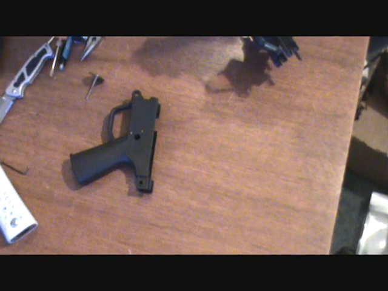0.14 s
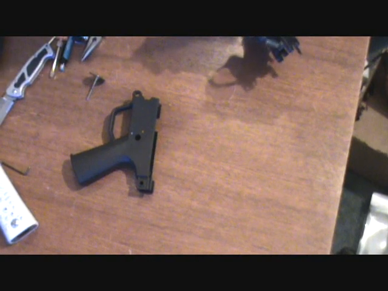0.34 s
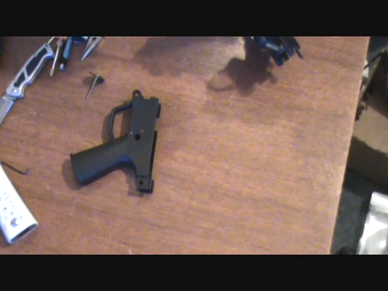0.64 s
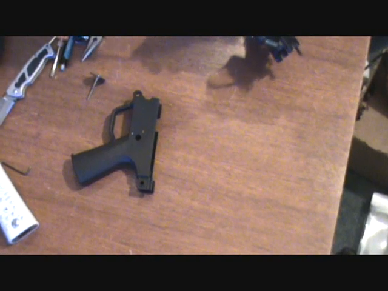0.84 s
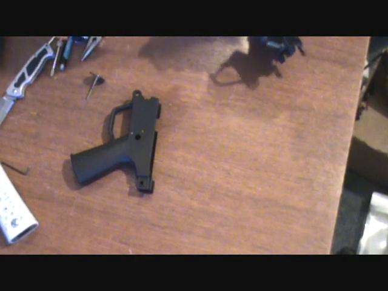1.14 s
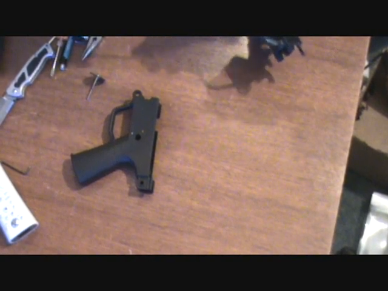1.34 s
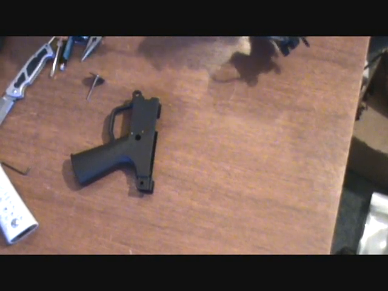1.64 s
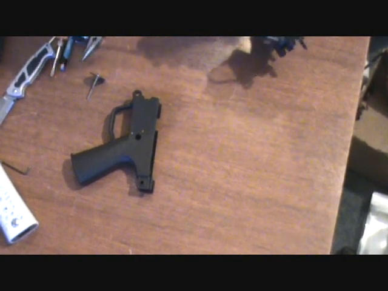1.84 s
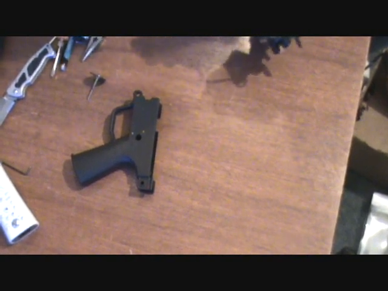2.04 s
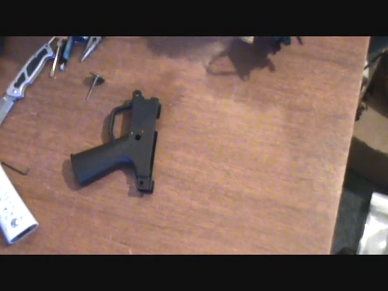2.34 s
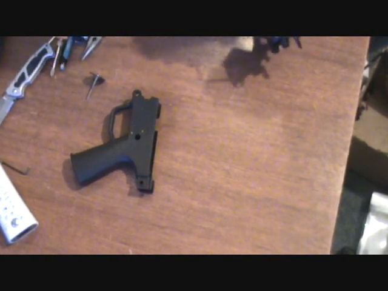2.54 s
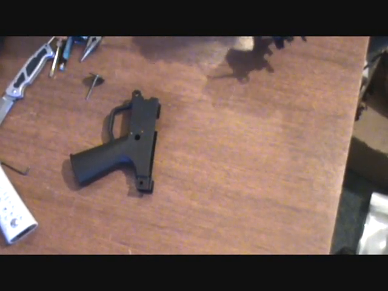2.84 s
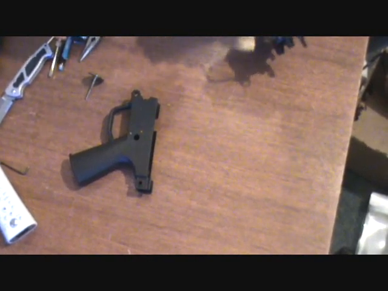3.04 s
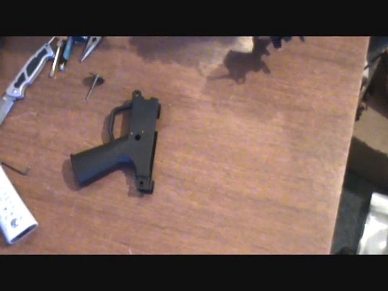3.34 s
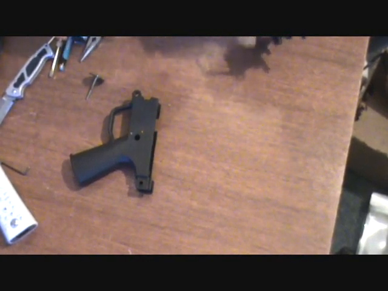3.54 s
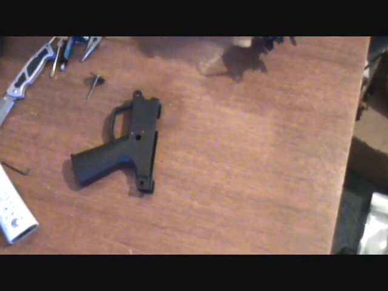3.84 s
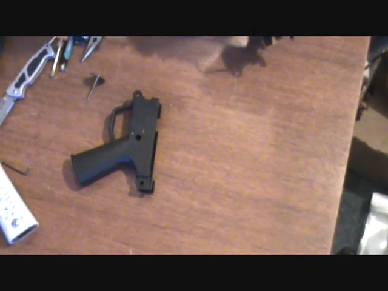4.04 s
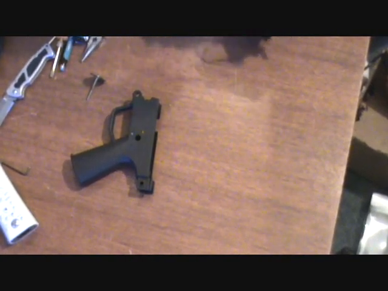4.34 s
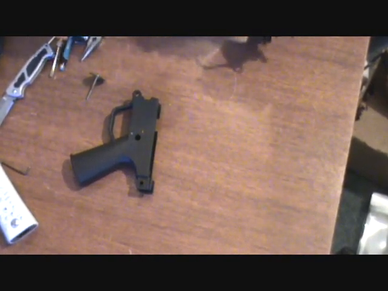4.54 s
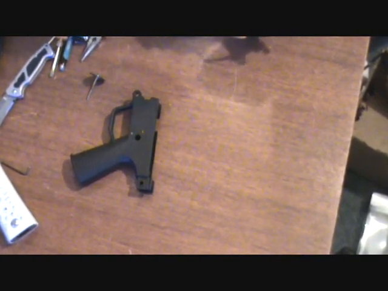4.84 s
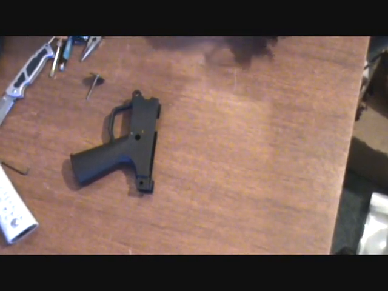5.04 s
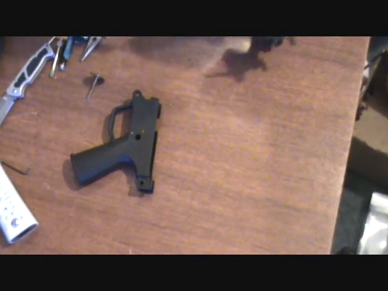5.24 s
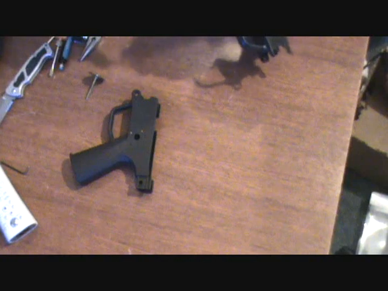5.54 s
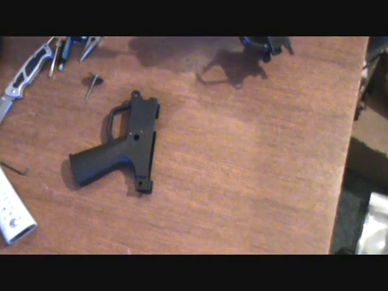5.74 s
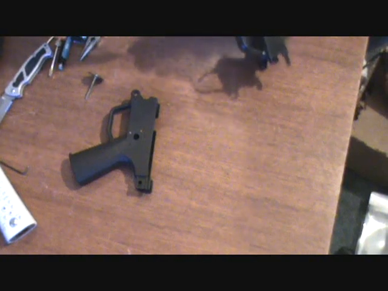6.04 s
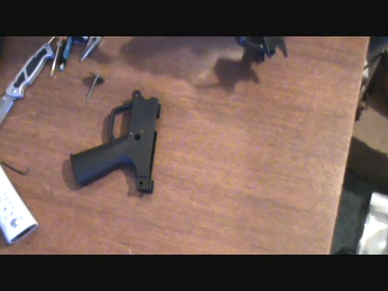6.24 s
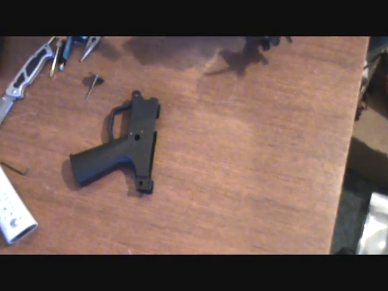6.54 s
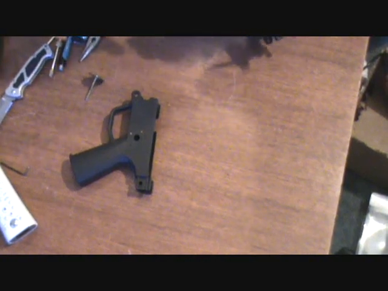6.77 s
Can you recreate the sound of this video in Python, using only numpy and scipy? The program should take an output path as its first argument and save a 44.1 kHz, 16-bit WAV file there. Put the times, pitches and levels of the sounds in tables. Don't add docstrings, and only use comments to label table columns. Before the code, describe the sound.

After a near-quiet half second of hiss and hum, a bright metal snap rings out, then pairs of clicks, a run of ticks, and dense snapping and scraping in the middle. Hard, rapid clinks follow around five seconds, then a crisp glancing tick after six and a fade into faint touches. Heard from about half a metre in a small, dry furnished room.

```python
import sys
import numpy as np
from scipy import signal
from scipy.fft import rfft, irfft, next_fast_len
from scipy.io import wavfile
from scipy.ndimage import map_coordinates

SR = 44100
rng = np.random.default_rng(int(sys.argv[2]) if len(sys.argv) > 2 else 0)


def undo_db(level):
    steps = np.asarray(level, float) / 20
    return 10 ** steps


def to_wav(sig):
    pcm = np.clip(np.atleast_2d(sig), -1, 1) * 32767
    pcm = np.round(pcm).astype(np.int16)
    wavfile.write(sys.argv[1], SR, pcm.T)


N = 304593

# (pitch [Hz], level [dB], width [Hz])
HOUSING = [(1765, -5, 275), (2287, 2.5, 190), (2500, -1.5, 480)]


def unit(x):
    return x / np.sqrt(np.mean(x ** 2) + 1e-20)


def along(points, hz):
    f, v = np.transpose(points)
    return np.interp(np.log(hz + 1), np.log(f + 1), v)


def curves(rows):
    s, *cols = np.transpose(rows)
    return [np.interp(np.arange(N) / SR, s, c) for c in cols]


def wobble(rate):
    knots = rng.standard_normal(int(N * rate / SR) + 4)
    return map_coordinates(knots, [np.arange(N) * rate / SR])


def filtered(x, response):
    m = next_fast_len(N + 8192)
    return irfft(rfft(x, m) * response(np.fft.rfftfreq(m, 1 / SR)), m)[..., :N]


def band(x, low_hz, high_hz):
    sos = signal.butter(3, [low_hz, min(high_hz, .45 * SR)], "bandpass", fs=SR, output="sos")
    return signal.sosfilt(sos, x)


def resonance(hz, width_hz):
    return lambda f: 1j * f * width_hz / (hz * hz - f * f + 1j * f * width_hz)


def rush(gain, alike):
    def mid_side(hz):
        turn = np.arccos(np.clip(along(alike, hz), -1, 1)) / 2
        return gain(hz) * [np.cos(turn), np.sin(turn)]

    mid, side = filtered(rng.standard_normal((2, N)), mid_side)
    return unit(np.array([mid + side, mid - side]))


def background():
    # (pitch [Hz], rms level [dB])
    whines = [(258.4, -69.5), (753.7, -71.5), (839.8, -78), (904.4, -69.5), (1184, -71.5), (1960, -68.5),
              (2110, -71.5)]
    # (pitch [Hz], rms level [dB])
    hum = [(52.5, -63.5)]
    # (frequency [Hz], level per Hz [dB])
    hiss_colour = [(25, -27), (40, 0), (75, -12), (205, -4.5), (360, -4.5), (500, -7.5), (900, -6.5),
                   (1500, -11), (2000, -10.5), (4080, -20.5), (8000, -23.5), (11500, -22), (14000, -22.5),
                   (15800, -24.5)]
    # (frequency [Hz], correlation [1])
    likeness = [(60, 0.93), (180, 0.88), (550, 0.3), (1650, 0.029), (4970, 0.084), (15000, 0.87)]
    t = np.arange(N) / SR
    tones = np.zeros(N)
    for hz, db in whines + hum:
        unsteady_time = t + 0.00217 * np.cumsum(wobble(5)) / SR
        tones += undo_db(db + 2.5 + wobble(7.7)) * np.sin(2 * np.pi * hz * unsteady_time)
    hiss = rush(lambda f: undo_db(along(hiss_colour, f)), likeness)
    return tones + undo_db(-54 + 0.07 * wobble(2.0)) * hiss


def engine():
    # (time [s], firing pitch [Hz], tone level [dB])
    drone = [
        (0.5, 120.2, -82),
        (0.8, 113, -72),
        (1.14, 117.3, -59),
        (1.6, 115, -60.5),
        (2.3, 121.2, -55.5),
        (2.7, 110.2, -60.5),
        (3.1, 112, -67),
    ]
    firing_hz, tone_db = curves(drone)
    t = np.arange(N) / SR
    passing = np.interp(t, [.3, .7, 2.95, 3.3], [0, 1, 1, 0])
    tone = undo_db(tone_db - 3 + 0.96 * wobble(7.55)) * np.sin(2 * np.pi * np.cumsum(firing_hz) / SR)
    low, high = resonance(205, 30), resonance(255, 35)
    rumble = rush(lambda f: np.abs(low(f)) ** 2 + np.abs(high(f)) ** 2, [(200, 0.94)])
    rumble_db = -60.5 - (t - drone[0][0])
    return passing * (tone + undo_db(rumble_db) * rumble)


def bumps():
    # (time [s], peak level [dB], pitch [Hz], t60 [s])
    table_bumps = [(2.223, -43.5, 614, 0.2), (2.243, -42, 256, 0.053), (2.261, -49.5, 184, 0.3),
                   (2.298, -52, 272, 0.093), (3.394, -33.5, 514, 0.054), (5.016, -39, 1370, 0.085),
                   (5.201, -45, 197, 0.14), (5.207, -39.5, 1500, 0.18), (5.497, -50, 460, 0.076),
                   (5.951, -56, 790, 0.12), (5.967, -49, 434, 0.11), (6.02, -47, 150, 0.14),
                   (6.235, -66, 1170, 0.13), (6.511, -63, 264, 0.095), (6.888, -68, 266, 0.084)]
    out, t = np.zeros(N + SR), np.arange(SR // 3) / SR
    for s, db, hz, t60 in table_bumps:
        wood = unit(band(rng.standard_normal(len(t)), 0.77 * hz, 2.23 * hz))
        onset = 1 - np.exp(-t * hz / 1.12)
        out[round(s * SR):][:len(t)] += undo_db(db + 4.5 - 60 * t / t60) * onset * wood
    return out[:N]


def tails(count, alike=0.72):
    # (frequency [Hz], t60 [s])
    room_decay = [(500, 0.37), (1320, 0.23), (3480, 0.21), (9190, 0.18)]
    hz, t, z = signal.stft(rng.standard_normal((count, 2, SR // 3)), SR, nperseg=128)
    fade = undo_db(-60 * t / along(room_decay, hz)[:, None])
    noise = signal.istft(z * fade, SR, nperseg=128)[1]
    noise *= 1 - np.exp(-np.arange(noise.shape[-1]) / SR / 0.004)
    left = noise[:, 0]
    right = alike * left + np.sqrt(1 - alike ** 2) * noise[:, 1]
    return np.stack([left, right], axis=1) / np.linalg.norm(left, axis=1)[:, None, None]


def rubbing():
    # (middle [s], length [s], housing level [dB], grit against housing [dB])
    strokes = [(0.647, 0.63, -65, -11), (1.1, 0.11, -73, -25), (1.544, 0.27, -44, -21),
               (1.775, 0.19, -45, -36), (2.771, 0.23, -35, -31), (3.06, 0.23, -32, -22),
               (3.258, 0.25, -45.5, -16), (3.64, 0.69, -57.5, -14), (4.019, 0.15, -60.5, 0),
               (4.17, 0.44, -51, -45), (4.45, 0.15, -48.5, -25), (4.817, 0.27, -58, -4),
               (5.1, 0.44, -48, -29), (5.405, 0.63, -54.5, -11.5), (6.347, 0.35, -51.5, -34)]
    # (frequency [Hz], level per Hz [dB])
    grit_colour = [(2000, -6), (3000, -1.5), (4300, -3), (5200, -3), (7100, -6), (9300, -10.5),
                   (11500, -6.5), (15500, -48)]
    middle, length, db, grit_db = (c[:, None] for c in np.transpose(strokes))
    swell = np.cos(np.pi * np.clip((np.arange(N) / SR - middle) / length, -.5, .5)) ** 2
    swell = swell ** (1.55 / 2)
    housing = undo_db(-78) + np.sum(undo_db(db) * swell, axis=0)
    gritty = undo_db(-65) + np.sum(undo_db(db + grit_db) * swell, axis=0)
    catches = rng.standard_normal(N) * (rng.random(N) < 800 / SR)
    catches *= undo_db(5 * wobble(60))
    body = filtered(catches, lambda f: sum(undo_db(level) * resonance(hz, width)(f)
                                           for hz, level, width in HOUSING))
    grit = filtered(catches, lambda f: undo_db(along(grit_colour, f)))
    direct = undo_db(-9) * housing * unit(body) + undo_db(-3) * gritty * unit(grit)
    return direct + undo_db(3) * signal.fftconvolve(direct[None], tails(count=1)[0], axes=1)[:, :N]


def chatter(count):
    t = np.arange(400) / SR
    rattle = rng.standard_normal((count, 1, len(t))) * np.exp(-t / 0.0024)
    return undo_db(3.5) * rattle / np.linalg.norm(rattle, axis=2, keepdims=True)


def in_room(times, clean, room_db):
    # (delay [s], level [dB])
    near_surfaces = [(.0014, -2), (.0045, -8.5), (.006, -7.5), (.0085, -25), (.013, -23)]
    space = undo_db(room_db)[:, :, None] * tails(len(times))
    space[:, :, 0] += 1
    rattle = chatter(len(times))
    space[:, :, :rattle.shape[2]] += rattle
    scatter = rng.standard_normal((len(times), len(near_surfaces), 3))
    for k, (delay, db) in enumerate(near_surfaces):
        space[:, :, round(delay * SR)] += undo_db(db + 2 * scatter[:, k, :1] + scatter[:, k, 1:])
    out = np.zeros((2, N + SR))
    for start, sound in zip(times, signal.fftconvolve(clean[:, None], space, axes=2)):
        out[:, round(start * SR):][:, :sound.shape[1]] += sound
    return out[:, :N]


def sparks():
    # (time [s], peak level [dB], room answer [dB])
    glances = [
        (2.7656, -43, -4),
        (3.0425, -39, -6),
        (3.7449, -37, -6),
        (4.4912, -27, -4),
        (4.804, -44.5, -11),
        (5.238, -48, -11),
        (6.2248, -13, 0),
    ]
    s, peak_db, room_db = (c[:, None] for c in np.transpose(glances))
    tick = band(np.eye(1, 256), 9700, 14000)
    return in_room(s[:, 0], undo_db(peak_db + 1) * tick, room_db)


def family(modes, count, hz):
    centre, db, width = (c[None, :, None] for c in np.transpose(modes))
    chance = rng.standard_normal((count, 2, len(modes), 1))
    each = np.abs(resonance(centre * (1 + chance[:, 1] / 45), width)(hz)) ** 4
    power = np.sum(undo_db(2 * (db + 2 * chance[:, 0])) * each, axis=1)
    return power / power.sum(axis=1, keepdims=True)


def causal(power):
    cepstrum = irfft(np.log(power + 1e-12 * power.max(axis=1, keepdims=True)) / 2)
    half = cepstrum.shape[1] // 2
    cepstrum[:, 1:half] *= 2
    cepstrum[:, half + 1:] = 0
    return irfft(np.exp(rfft(cepstrum)))[:, :half]


def clicks():
    # (pitch [Hz], level [dB], width [Hz])
    knock = [(464, 12, 140), (800, -13, 580), (1406, 17.5, 1680)]
    steel = [(3000, -5.5, 3800), (4290, -13, 3900), (5690, -3.5, 1300)]
    bright = [(6540, 26, 1100), (8200, 31, 4100), (9700, 2, 840), (12200, -37, 860)]
    long_pin = [(4240, 1, 850), (7200, -9, 1100), (9000, -10, 1100)]
    short_pin = [(4280, 5, 1600), (6320, 4, 1100), (8100, -8.5, 2400)]
    # (time [s], peak of the 3-6 kHz ring [dB],
    # housing ring against peak [dB], bright ring against peak [dB], room answer [dB])
    long_snaps = [(0.7733, -10, -14.5, -1, -2), (1.5515, -30, -5, -15, -6), (1.8075, -34, -2, -20, -10),
                  (1.8185, -11, -13.5, -1.5, 0), (2.952, -16, -9, -9, -1.5), (2.956, -19.5, -19, -15, 1),
                  (3.043, -12.5, -16, -8.5, -0.5), (3.156, -11.5, -18, -5.5, -2.5),
                  (3.1625, -17.5, -3, -14, -5), (3.3984, -11, -2, -2, -2), (3.4281, -21, -13, -11, -8),
                  (3.7453, -9, -13, -5.5, -2), (4.4915, -9, -30, -1.5, 0.5), (4.6759, -14, -6, -2, 1.5),
                  (5.0794, -25.5, -13.5, -19.5, -5), (5.168, -23, -9, -22, 3),
                  (6.248, -20.5, -9.5, -12, -4.5), (6.3096, -27, -3, -7, -1.5)]
    # (time [s], peak [dB], housing ring [dB], bright ring [dB])
    ticks = [(0.5463, -37.5, -8, -11), (1.1573, -37.5, 3, -23), (2.1287, -29.5, -2, -6),
             (2.361, -37, -6, -17), (2.3988, -39.5, -11, -9), (2.4212, -32.5, -6.5, -6),
             (2.6893, -35, 3.5, -4), (2.706, -27, -1.5, -9), (2.7305, -34.5, -1, -1.5),
             (2.7472, -37, 0, -15), (2.7582, -32, -3, 4.5), (3.019, -26, -17, -15), (3.026, -31, -25, -12),
             (3.3857, -42.5, 9, -24), (3.7246, -34.5, -14, -14), (4.4086, -33.5, 2.5, -33),
             (4.7886, -26, 2, -19), (5.016, -39, -9, -22), (4.5124, -21.5, -4.5, -19),
             (5.0695, -40, -9, -25), (5.1125, -37, -10, -13), (5.1449, -29.5, 1.5, -3),
             (5.2063, -34, 2, -12), (5.3563, -33, 0.5, -14), (6.2139, -30.5, -4.5, -25),
             (6.2274, -31.5, -10, -4), (6.3825, -40, -2, -18), (6.3992, -49, -24, -21),
             (6.704, -41, -9, -23), (6.717, -54, 2, 3)]
    # (time [s], peak [dB], housing ring [dB])
    touches = [(0.5709, -48, -2), (0.591, -56, 3), (0.644, -55, -14), (1.0733, -55, 1.5), (1.4583, -59, 1),
               (2.0456, -52, -18), (2.497, -54.5, 1), (2.8906, -44, -18), (3.2913, -45, -2),
               (3.5793, -41.5, -6), (3.6462, -44, 1.5), (3.656, -53, -7), (3.6943, -48.5, 8.5),
               (4.049, -40, 0), (4.0746, -46, -15), (4.149, -47, -5), (4.1738, -50.5, 0), (4.298, -60, 3),
               (4.4543, -51, 9), (5.3271, -41, -0.5), (5.3757, -46, -17), (5.4749, -45, -9),
               (5.5314, -47, -5), (5.7796, -48, 1.5), (5.82, -54, 1), (5.959, -60.5, 5.5), (6.386, -61, -5),
               (6.494, -54, -8), (6.547, -72, -13), (6.7521, -54, -8)]
    # (time [s], peak [dB], housing ring [dB], bright ring [dB], room answer [dB])
    short_snaps = [
        (1.1687, -28.5, -23, -24, -2),
        (1.5614, -13, -13, -15, 0),
        (2.7653, -14.5, -27, -11, 0),
        (4.6836, -12.5, -17, -5.5, -5),
        (4.804, -11.5, -14.5, -4, 2),
        (4.9828, -39.5, -11, -6, 2),
        (5.1049, -26.5, -9, -2.5, 1),
        (5.1224, -24.5, -8.5, -11, 1.5),
        (5.238, -9.5, -34, -2, -0.5),
        (5.263, -23.5, -40, -20, 6.5),
    ]
    rows = long_snaps + [(*tick, -0.5) for tick in ticks]
    rows += [(*touch, -13.5, 7) for touch in touches] + short_snaps
    s, peak_db, housing_db, bright_db, room_db = (c[:, None] for c in np.transpose(rows))
    knock_db = -12 - 0.55 * (peak_db + 12.5)
    n, hz = len(s), np.fft.rfftfreq(2048, 1 / SR)
    power = (undo_db(2 * knock_db) + undo_db(2 * -19)) * family(knock, n, hz)
    power += undo_db(2 * (housing_db + 9.5)) * family(HOUSING, n, hz)
    power += family(steel, n, hz)
    power += undo_db(2 * (bright_db + 6)) * family(bright, n, hz)
    short = len(short_snaps)
    power += np.vstack([family(long_pin, n - short, hz), family(short_pin, short, hz)])
    power /= 1 + (hz / 11500) ** 8
    return in_room(s[:, 0], undo_db(peak_db + 32.5) * causal(power), room_db + 8)


def scene():
    return background() + engine() + bumps() + rubbing() + sparks() + clicks()


def top_cut(x):
    return signal.sosfilt(signal.butter(12, 16650, fs=SR, output="sos"), x)


def record(dry):
    memory = np.exp(-1 / (.25 * SR))
    loudness = signal.lfilter([1 - memory], [1, -memory], np.mean(dry ** 2, axis=0))
    gain = (1 + loudness / undo_db(2 * -38)) ** -.15
    bass = filtered(dry, lambda hz: 1 / (1 + (hz / 300) ** 2))
    mix = filtered(bass + (dry - bass) * gain, lambda hz: hz < 15900)
    return top_cut(mix)


dry = scene()
out = record(dry)
to_wav(out)
```